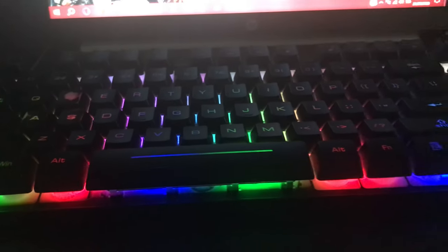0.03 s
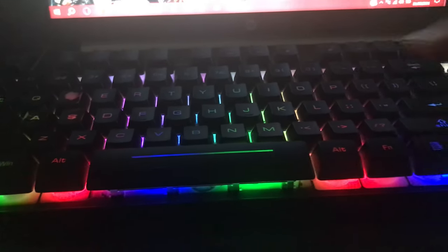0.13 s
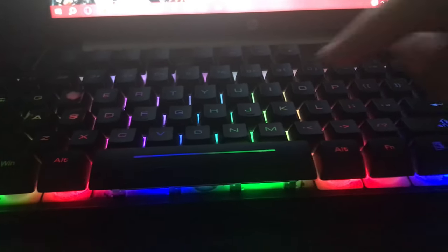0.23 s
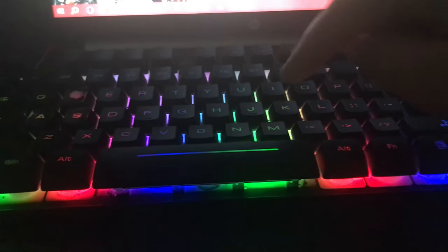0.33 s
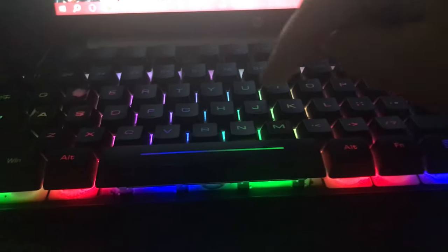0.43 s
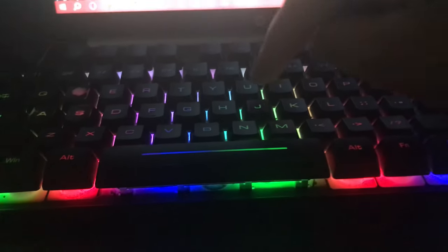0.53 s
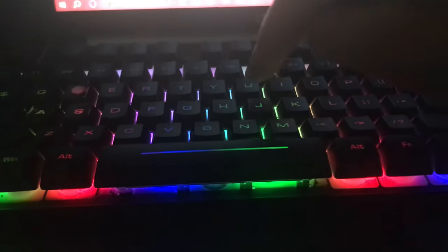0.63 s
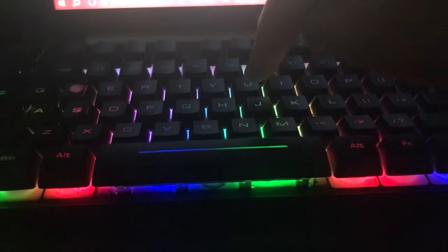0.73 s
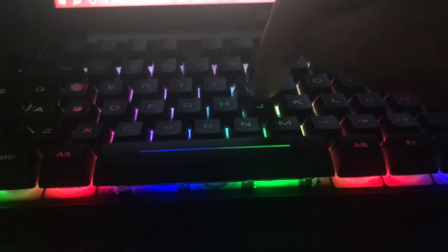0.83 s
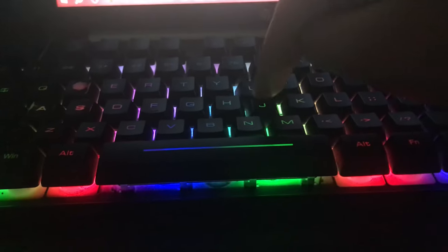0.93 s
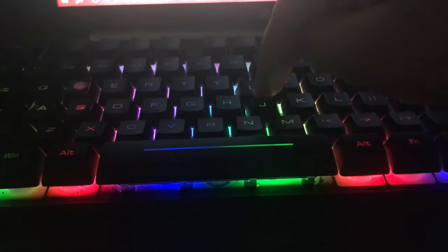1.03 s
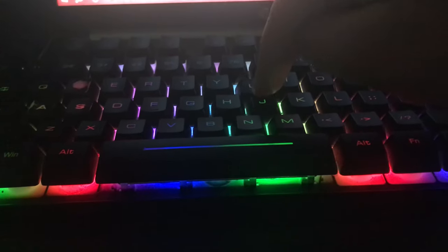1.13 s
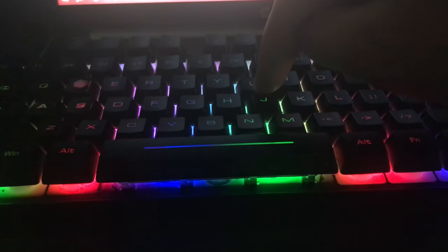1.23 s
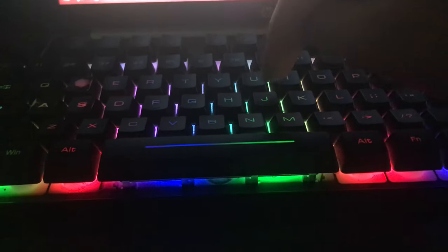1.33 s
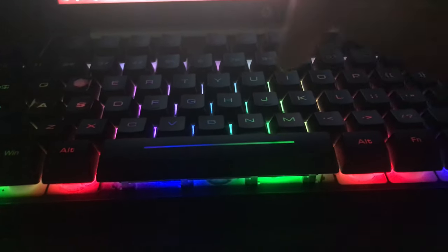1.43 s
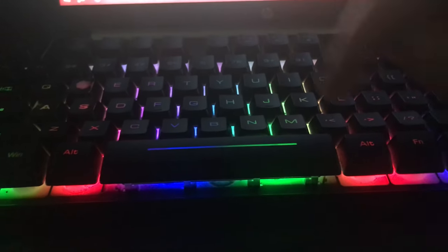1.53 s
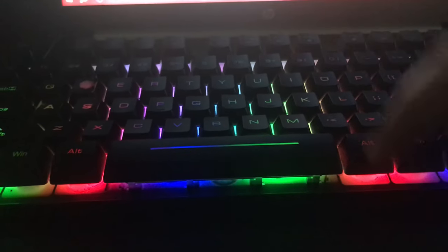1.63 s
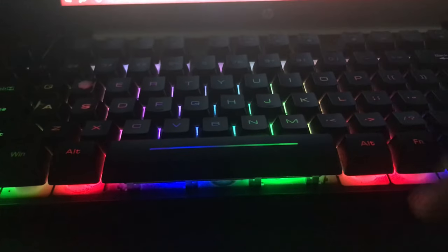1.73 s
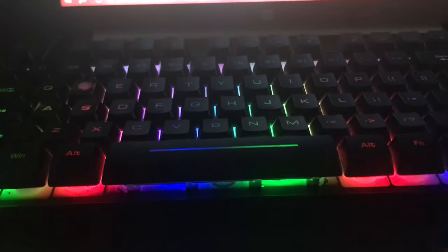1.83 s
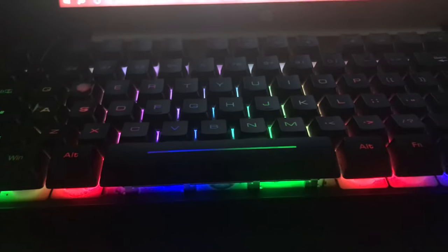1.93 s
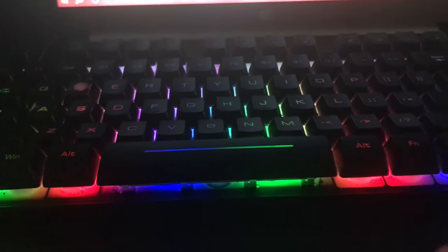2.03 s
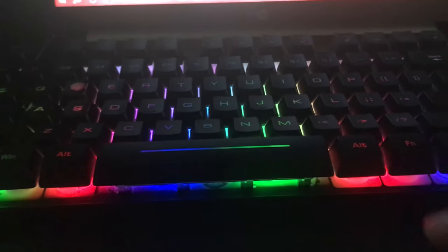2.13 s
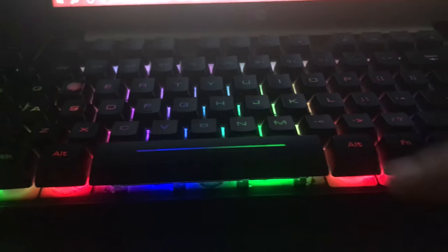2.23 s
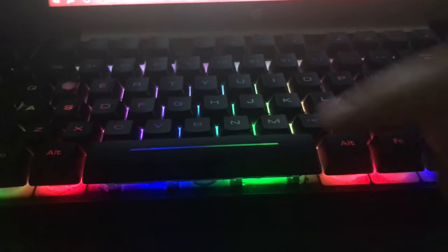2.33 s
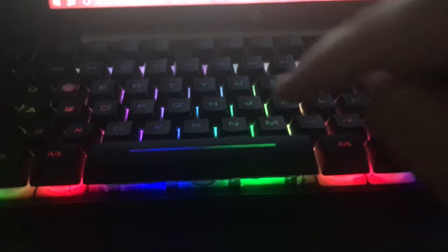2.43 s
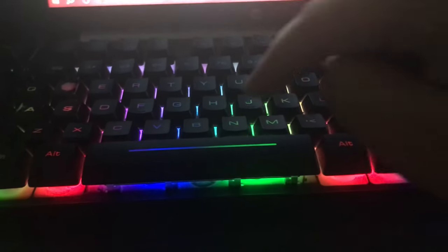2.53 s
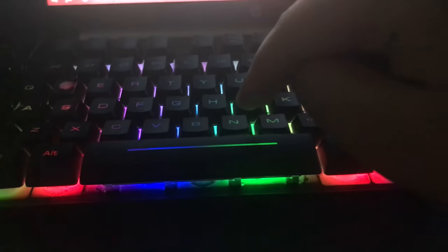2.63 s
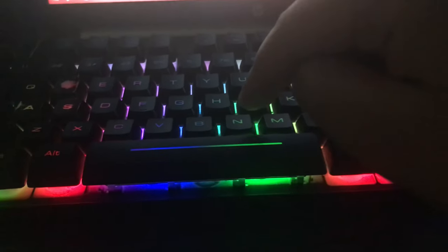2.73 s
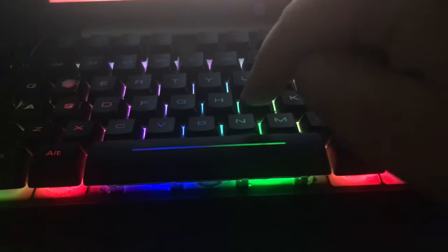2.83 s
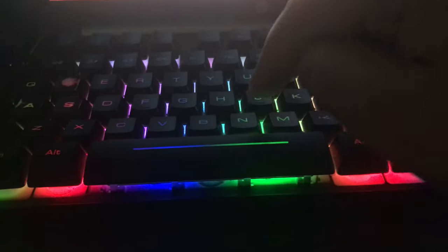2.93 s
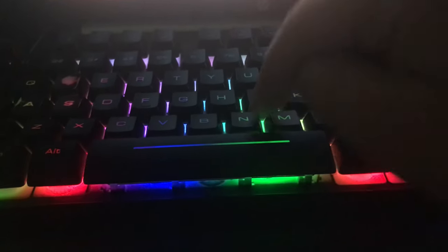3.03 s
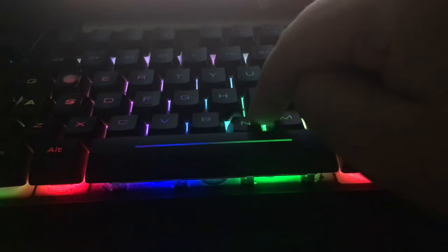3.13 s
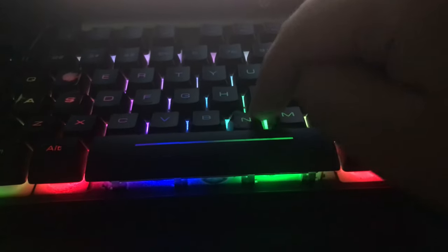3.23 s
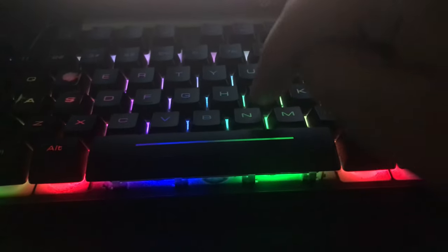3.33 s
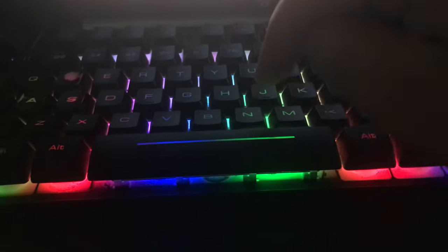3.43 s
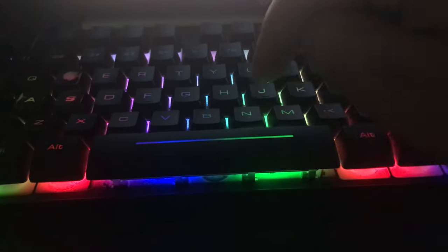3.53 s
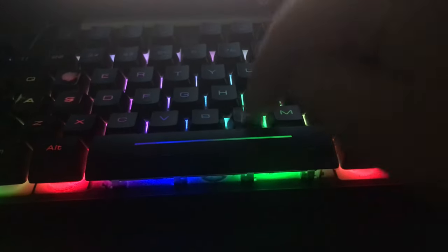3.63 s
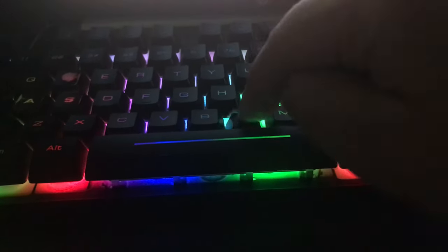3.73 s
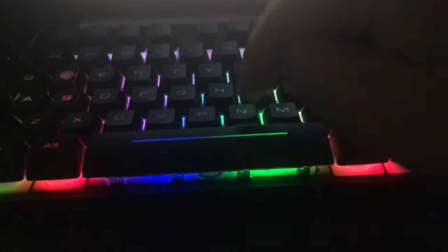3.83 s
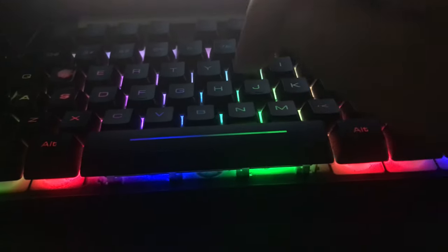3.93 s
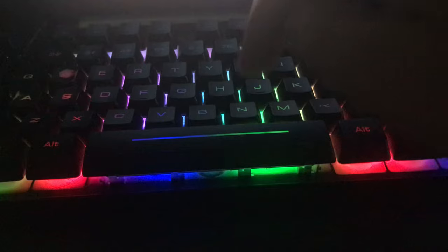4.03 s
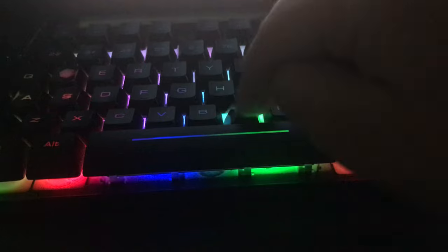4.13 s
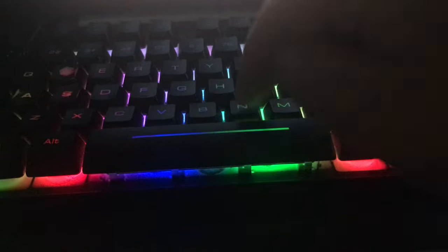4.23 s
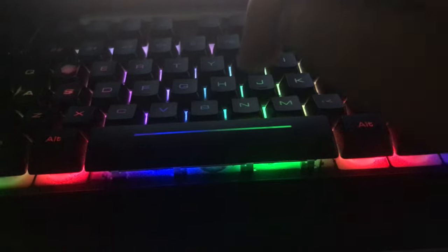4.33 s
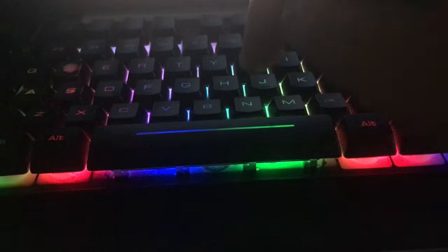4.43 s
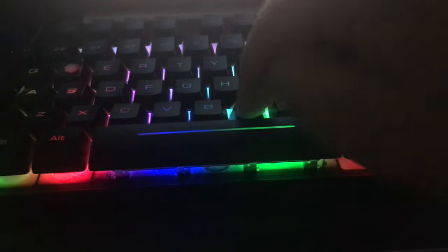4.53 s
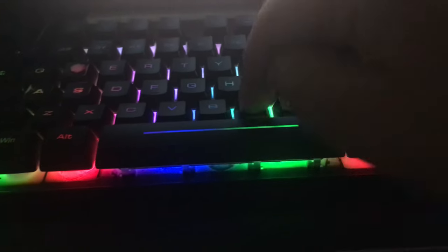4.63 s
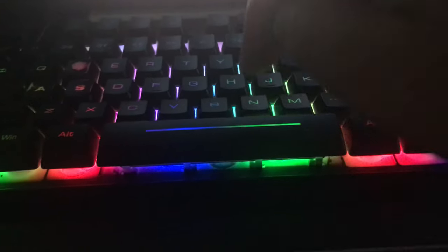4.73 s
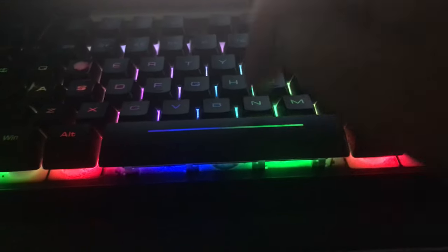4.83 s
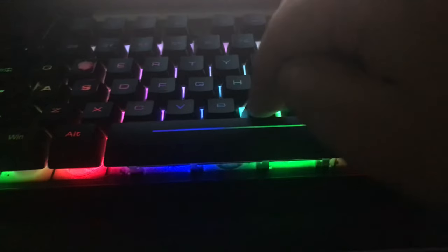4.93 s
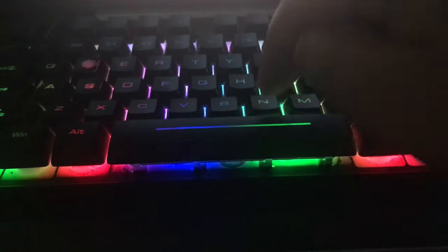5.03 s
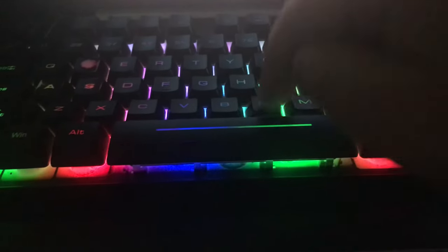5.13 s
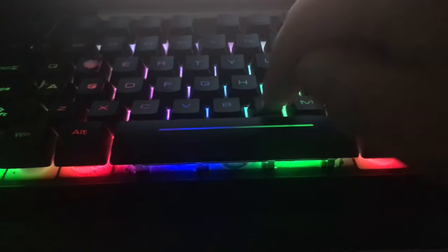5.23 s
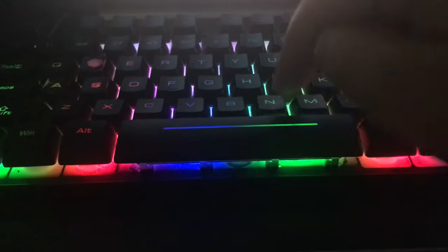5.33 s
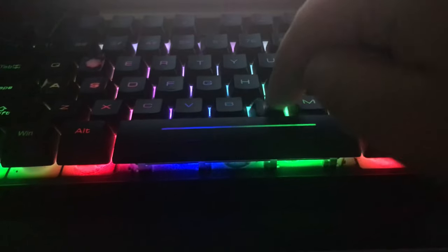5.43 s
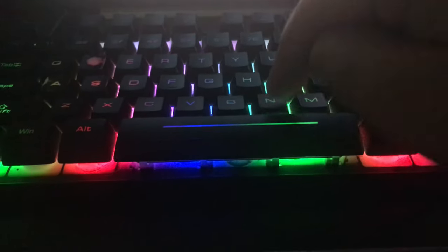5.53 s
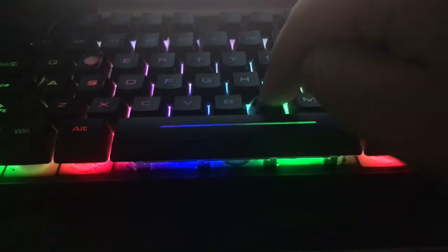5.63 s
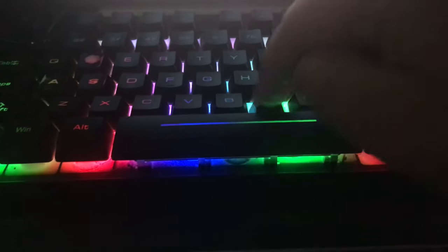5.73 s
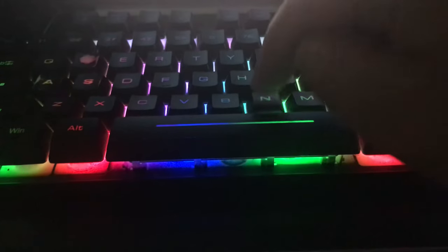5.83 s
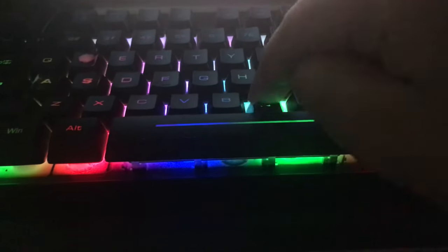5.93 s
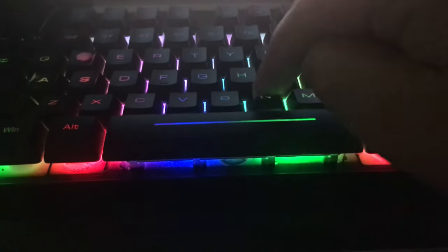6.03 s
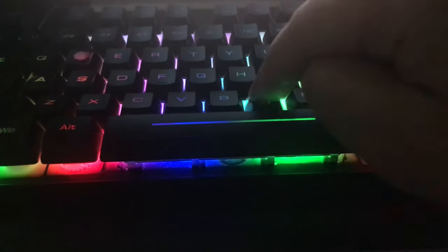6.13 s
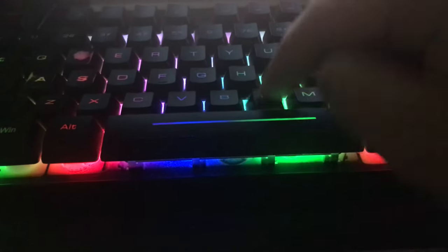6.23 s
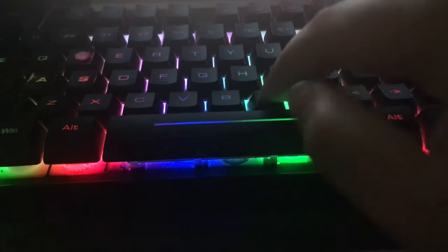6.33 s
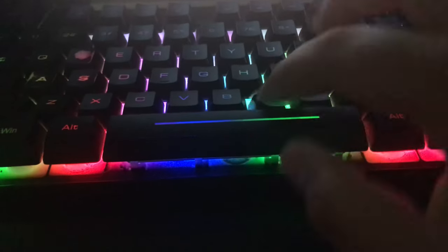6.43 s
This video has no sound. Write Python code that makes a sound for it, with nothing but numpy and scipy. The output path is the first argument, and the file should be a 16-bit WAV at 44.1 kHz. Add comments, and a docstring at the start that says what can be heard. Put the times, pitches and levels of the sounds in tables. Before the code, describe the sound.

One finger taps a plastic laptop-style keyboard in a quiet room, one lone stroke, then separate strokes quickening into frantic clattering key mashing.

```python
"""One finger pokes at a plastic backlit keyboard, close to a phone in a small quiet room with a faint hum.
A single stroke comes first; then the hand slides over the case with soft knocks and faint squeaks.
Strokes return one by one, then faster and faster: each is a tap, the key giving way, and a landing thump.
Keys clack as they spring back or are grazed; later loose neighbours chatter over a low rumble of the desk.
Each contact is a burst of tiny hits that rings the modes of the key parts, the hollow case and the desk."""
import sys
import numpy as np
from scipy import signal
from scipy.fft import rfft, irfft
from scipy.io import wavfile

SR = 44100
rng = np.random.default_rng(int(sys.argv[2]) if len(sys.argv) > 2 else 0)


def waveform_to_disk(signal):
    """Save audio, clipped to [-1, 1], as 16-bit WAV at the path in sys.argv[1]."""
    frames = np.transpose(np.atleast_2d(signal))
    scaled = np.clip(frames, -1, 1) * 32767
    samples = np.round(scaled).astype(np.int16)
    wavfile.write(sys.argv[1], SR, samples)


N = 286650  # length of the scene [samples]
CLACK_SIZE = 2600  # length of one push and of one ring [samples]


def undb(db):
    """Turn decibels into gain."""
    return 10 ** (np.asarray(db) / 20)


def unit(x):
    """Scale to an energy of one."""
    return x / np.sqrt(np.sum(x ** 2))


def lookup(hz, table):
    """Read a (frequency, value) table between its points, on a log-frequency axis."""
    f, v = np.transpose(table)
    return np.interp(np.log(np.maximum(hz, 1)), np.log(f), v)


def add(out, s, x):
    """Mix x into out at time s [s]."""
    i = max(int(s * SR), 0)
    out[i:i + len(x)] += x[:max(len(out) - i, 0)]


def band(x, lo_hz, hi_hz, order=2):
    """Keep only the sound between two frequencies."""
    edges = [lo_hz, min(hi_hz, SR / 2 - 1000)]
    return signal.sosfilt(signal.butter(order, edges, "band", fs=SR, output="sos"), x)


# What each part rings with, before small changes from clack to clack:
# (pitch [Hz], relative level [dB], time to fade by 60 dB without the finger [s])
DESK_MODES = [(89, -5, 0.15), (179, -4, 0.066), (260, 1.5, 0.13), (437, -1.5, 0.13), (575, 9, 0.071)]
CASE_MODES = [(942, -11.5, 0.11), (1036.4, 2.5, 0.06), (1101, 5, 0.033), (1170, -1, 0.05), (1484, -4, 0.12),
              (1649, -1, 0.019)]
KEYCAP_MODES = [(1920, -46, 0.044), (2187, -0.5, 0.034), (2292, 1.5, 0.037), (2565, 2.5, 0.016),
                (2646, -3.5, 0.035), (3130, -10.5, 0.011), (3074, -8, 0.098), (3870, -11, 0.016),
                (4082, -12, 0.035), (4230, -10, 0.0065), (4654, -14.5, 0.042)]
STEM_MODES = [(5600, 2.5, 0.062), (5870, -0.5, 0.061), (6800, -11, 0.013), (7126, 10.5, 0.0076),
              (7150, 3, 0.055), (7380, -2.5, 0.014), (8280, 1, 0.0089), (8650, -10, 0.023),
              (8910, -5.5, 0.015)]
EDGE_MODES = [(10000, -3, 0.0081), (12150, -19, 0.023), (12360, -4, 0.013), (14250, -11, 0.018),
              (14500, -18, 0.0089), (14750, 16, 0.006), (14300, -2, 0.017)]


def keyboard(desk_db=-18.0):
    """Stem and edge get their hits earlier in a contact, cap and case later; the case shakes the desk."""
    contact_rows = np.vstack([presses(), clacks(), chatter()])
    times, rattle_ms, case_db, cap_db, stem_db, edge_db = contact_rows.T
    landing = contacts(rattle_ms, skew=.55, scrape=0.44, lead=0.27)
    sliding = contacts(rattle_ms, skew=.85, scrape=0.67, lead=0.16)
    desk = part(DESK_MODES, times, landing, case_db + desk_db, crack=0.42, crack_lo_hz=160,
                crack_hi_hz=730, crack_t60=0.13, detune=0.012, spot_db=6.5)
    case = part(CASE_MODES, times, landing, case_db, crack=0.73, crack_lo_hz=922,
                crack_hi_hz=1876, crack_t60=0.027, detune=0.018, spot_db=3.5)
    cap = part(KEYCAP_MODES, times, landing, cap_db, crack=0.32, crack_lo_hz=1600,
               crack_hi_hz=3800, crack_t60=0.044, detune=0.011, spot_db=2.0)
    stem = part(STEM_MODES, times, sliding, stem_db, crack=0.62, crack_lo_hz=5600,
                crack_hi_hz=8930, crack_t60=0.024, detune=0.0007, spot_db=2.0)
    edge = part(EDGE_MODES, times, sliding, edge_db, crack=0.69, crack_lo_hz=9600,
                crack_hi_hz=15400, crack_t60=0.025, detune=0.013, spot_db=4)
    return desk + case + cap + stem + edge


# Full key presses: (time [s], travel time [ms], rattle of the tap [ms], tap level [dB],
# landing level [dB], extra weight on the case [dB], extra brightness [dB])
KEY_PRESSES = [(.829, 21, 3.75, -38.5, -40, -0.5, 0), (3.0697, 22, 2.6, -41, -45, -0.5, 5.5),
               (3.6566, 25.8, 3.96, -34.5, -41, 1, 3.5), (4.1242, 19.8, 2.9, -30.5, -41, -1.5, 0.5),
               (4.5452, 18.8, 5.4, -50.5, -48, 2, -1), (4.899, 15, 2.7, -37.5, -42.5, 2, 0),
               (5.166, 17.6, 3.35, -41.5, -46.5, 0, -3), (5.3827, 22.1, 4.9, -35.5, -40, 0.5, 3),
               (5.5838, 18, 3.6, -40, -49.5, 3, -1.5)]
# How tap, giving way and landing (one row each) are shared among the parts:
# (case [dB], keycap [dB], stem [dB], edge [dB])
PRESS_SHARES = [(-7.5, 0, -6.5, -10.5), (-1, -2, -9.5, -14), (-9.5, 0.5, -12.5, -19)]
# After the tap the key gives way at this share of its travel, then lands
GIVE_SHARE, GIVE_RATTLE_MS, LANDING_RATTLE_MS = .6, 2.5, 2.6


def presses():
    """A press is three contacts: tap, giving way, landing; rows of (time [s], rattle [ms], four levels [dB])."""
    rows = []
    for s, travel_ms, tap_ms, tap_db, landing_db, weight_db, bright_db in KEY_PRESSES:
        stages = [(0, tap_ms, tap_db),
                  (GIVE_SHARE, GIVE_RATTLE_MS, landing_db),
                  (1, LANDING_RATTLE_MS, landing_db)]
        for (share, rattle_ms, db), mix in zip(stages, PRESS_SHARES):
            at = s + share * travel_ms / 1000
            rows.append([at, rattle_ms, *part_levels(db, mix, weight_db, bright_db)])
    return rows


# Keys that spring back or are grazed:
# (time [s], rattle [ms], level [dB], extra weight on the case [dB], extra brightness [dB])
KEY_CLACKS = [(0.8252, 2, -56.5, 11, 12), (0.8406, 2.9, -60, -6, 14), (0.868, 0.9, -61.5, -8, 17),
              (1.0887, 0.71, -62, 7, -1), (1.2884, 5, -52.5, -4, 7.5), (1.3152, .7, -61, 4, 4),
              (1.3254, 9, -50, 5, -1), (1.344, 3, -54, 1, -3), (1.358, 2.2, -62, -5, -7),
              (3.211, 0.47, -61, 1, -10), (3.2814, 5, -60, 4, 5), (3.292, 1.46, -47.5, 0, -2),
              (3.32, 4.7, -56, 5, -2), (3.367, 3.1, -62, 5.5, -7), (3.8194, 1.45, -50, 4, 2),
              (3.845, 3.9, -44, -1, -5), (3.8493, 6, -43, 0.5, 10), (4.2281, 1.43, -51, 5.5, 0),
              (4.2426, 0.99, -47, -0.5, 7), (4.2536, 1.35, -43.5, 4.5, 4), (4.263, 0.88, -37.5, -6, 2.5),
              (4.2728, 4.6, -49, 0, 10.5), (4.2841, 4.8, -59, 7, -2), (4.5893, 2.4, -56.5, 8.5, -7),
              (4.629, 8.2, -58.5, 10, -11), (4.656, 4.1, -55, 2, 4), (4.6642, 2.07, -41, -1.5, 0),
              (4.698, 2.87, -42.5, -5.5, -0.5), (4.71, 2.8, -49, -3, 4), (4.8942, 3.1, -52.5, -13, 6),
              (4.951, 8.1, -50.5, 4.5, -12), (4.9772, 9.2, -51.5, 3, -5), (4.9989, 2.54, -40, 4, -1.5),
              (5.0402, 3.05, -54.5, -1, 11.5), (5.0487, 0.84, -46.5, -18, 1.5),
              (5.162, 2.9, -50.5, -2, 6.5), (5.215, 2.28, -47, 3, -5), (5.244, 2.04, -48, 2.5, -2),
              (5.266, 1.38, -52.5, 3, -1), (5.292, 6.9, -42.5, -0.5, 8.5), (5.4691, 6.5, -56.5, 8, 3),
              (5.4852, 2.72, -49.5, 0, 2.5), (5.5038, 3.9, -49.5, 2.5, 3.5), (5.5186, 2.7, -48, 4, -1),
              (5.5796, 2.86, -43.5, 2, 6), (5.711, 0.88, -46.5, -1, -1.5), (5.7237, 2.48, -49.5, 9, 1),
              (5.7492, 2, -36, -1.5, -1.5), (5.7863, 8.3, -51, 1, -13), (5.8138, 8.9, -52.5, 7.5, 0),
              (5.8359, 9.1, -37, -3, -3), (5.8474, 5.5, -34, 1, 5.5), (5.859, 3.8, -41, -17, 4),
              (5.865, 2.93, -37.5, -17, 2), (5.882, 2.5, -56, -9, 5), (5.917, 2.3, -42, 0, 3),
              (5.9267, 0.86, -35, 0.5, 1), (5.9486, 2.28, -38, -3.5, -3), (6.0118, 1.6, -59, 14.5, -3),
              (6.0363, 1.26, -42.5, -2, -2.5), (6.0519, 2.5, -47, -5, 1.5), (6.073, 3.8, -49.5, 6.5, 2),
              (6.0792, 5.4, -51, 9.5, 5), (6.0922, 1.03, -30, -7, 0), (6.1123, 1.97, -38.5, -2, 1.5),
              (6.172, 4.4, -63, 14, -1), (6.1867, 2.64, -42.5, 2, 4), (6.203, 1.01, -36, -4.5, 1),
              (6.2142, 1.25, -45.5, 0, 1), (6.2589, 4.4, -48, 8, 4.5), (6.2763, 0.92, -51.5, 12, 5.5),
              (6.351, 1.4, -64, 15, -3), (6.3746, 1.5, -36, -0.5, -2), (6.4017, 3.55, -43.5, 3.5, 1.5),
              (6.4252, 3.3, -48, 7, 5), (6.4377, 1.11, -31, -1.5, -2)]
# How a clack is shared among the parts: (case [dB], keycap [dB], stem [dB], edge [dB])
CLACK_SHARES = (-6, 0, -7.5, -16)


def clacks():
    """A returning or grazed key makes one contact: rows of (time [s], rattle [ms], four levels [dB])."""
    rows = []
    for s, rattle_ms, db, weight_db, bright_db in KEY_CLACKS:
        rows.append([s, rattle_ms, *part_levels(db, CLACK_SHARES, weight_db, bright_db)])
    return rows


# Spells in which loose neighbours chatter under the finger:
# (start time [s], end time [s], contacts per second [1/s], average keycap level [dB])
CHATTER_SPELLS = [(3.23, 3.291, 62, -68), (3.704, 3.814, 99, -67.5), (4.15, 4.321, 75, -65),
                  (4.57, 4.701, 116, -61), (4.922, 5.05, 96, -60), (5.179, 5.3, 112, -61.5),
                  (5.41, 5.549, 93, -59), (5.6, 5.701, 80, -62), (5.699, 6.301, 136, -60),
                  (6.299, 6.482, 105, -63)]


def chatter(scatter_db=3, case_db=-3, stem_db=-9, edge_db=-20):
    """Loose keys touch faintly at random moments: rows of (time [s], rattle [ms], four levels [dB])."""
    rows = []
    for start, end, rate, db in CHATTER_SPELLS:
        count = max(int((end - start) * rate), 1)
        u = rng.random((count, 6))
        times = start + (end - start) * u[:, 0]
        rattle_ms = 3 * u[:, 1]
        # the root of 3 makes scatter_db the standard deviation
        scatter = scatter_db * (u[:, 2:] * 2 - 1) * np.sqrt(3)
        levels = db + np.array([case_db, 0, stem_db, edge_db]) + scatter
        rows.append(np.column_stack([times, rattle_ms, levels]))
    return np.vstack(rows)


def part_levels(db, mix, weight_db, bright_db, edge_slope=0.99):
    """Weight drives the case; a hard contact drives the stem and, by edge_slope [dB per dB], the edge."""
    return db + np.array(mix) + np.array([weight_db, 0, bright_db, edge_slope * bright_db])


def contacts(rattle_ms, skew, scrape, lead, count=5):
    """A rising scuff, a first touch, more touches as the key wobbles, and scraping: one row per contact."""
    push = np.zeros((len(rattle_ms), CLACK_SIZE))
    early = SR // 1000  # the scuff lasts 1 ms
    for row, ms in zip(push, rattle_ms):
        span = int(np.clip(ms * SR / 1000, 10, CLACK_SIZE / 2))
        # a smaller skew moves the touches later
        at = (span * rng.random(count) ** skew).astype(int)
        at[0] = 0
        touches = rng.standard_normal(count) / 2 + rng.choice([-1, 1], count)
        row[early + at] = unit(touches)
        row[early:early + span] += scrape * unit(rng.standard_normal(span))
        row[:early] += lead * unit(rng.standard_normal(early) * np.arange(early) ** 2)
    return push


def part(modes, times, push, level_db, crack, crack_lo_hz, crack_hi_hz, crack_t60, detune, spot_db):
    """Each contact rings one part, with its own pitch shift, hit spot and damping by the finger."""
    hz, db, t60 = np.transpose(modes)
    t = np.arange(CLACK_SIZE) / SR
    # dense, heavily damped modes between the main ones make a dry crack
    noise = rng.standard_normal(push.shape) * undb(-60 * t / crack_t60)
    cracks = band(noise, crack_lo_hz, crack_hi_hz, order=4)
    # dividing by the root of t60 evens out the energy of short and long rings
    fades = undb(db[:, None] - 60 * t / t60[:, None]) / np.sqrt(t60[:, None])
    # a small part gives off little sound below its lowest mode; the trace of noise avoids exact zeros
    push = band(push + 1e-18 * noise, 0.89 * hz.min(), SR / 2)
    finger_damping = rng.uniform(10, 170, len(times))  # extra decay rate [1/s]
    out = np.zeros(N)
    for s, force, dry_crack, loud_db, damping in zip(times, push, cracks, level_db, finger_damping):
        spot, shift = rng.standard_normal((2, len(hz)))
        gains = undb(spot_db * spot) * rng.choice([-1, 1], len(hz))
        pitches = hz * (1 + detune * shift)
        ring = gains @ (fades * np.sin(2 * np.pi * pitches[:, None] * t))
        answer = unit(ring * np.exp(-damping * t)) + crack * unit(dry_crack)
        clack = signal.fftconvolve(force, answer)
        # the scuff comes 1 ms before the touch; the level counts all energy as if spread over 10 ms
        add(out, s - .001, unit(clack) * np.sqrt(SR / 100) * undb(loud_db))
    return out


# The nearby walls' answer: (frequency [Hz], level [dB]) and (frequency [Hz], time to fade by 60 dB [s])
ECHO_LEVELS = [(150, 8.5), (500, -7.5), (1200, -11.5), (2500, -16), (6000, -19.5), (10000, -19.5),
               (16000, -18)]
ECHO_FADES = [(150, 0.18), (1200, 0.3), (2500, 0.17), (7000, 0.21), (16000, 0.087)]


def room(x, gap_s=0.0071, build_s=0.0018):
    """Nearby walls return a short blurred tail whose level and fading time depend on pitch."""
    t = np.arange(SR // 2) / SR
    f = np.fft.rfftfreq(len(t), 1 / SR)
    rise = 1 - np.exp(-np.maximum(t - gap_s, 0) / build_s)
    response = 0
    for hz in 100 * 2 ** np.arange(0, 7.5, .5):  # half-octave bands
        inside = (f >= hz) & (f < hz * np.sqrt(2))
        noise = irfft(rfft(rng.standard_normal(len(t))) * inside, len(t))
        tail = noise * rise * undb(-60 * t / lookup(hz, ECHO_FADES))
        # each band is weighted by its width
        response = response + unit(tail) * np.sqrt(inside.mean()) * undb(lookup(hz, ECHO_LEVELS))
    return signal.fftconvolve(x, response)[:N]


def thumps(delay_s=.016, below_landing_db=-13, hz=71.5, t60_s=0.22):
    """The desk gives a little after each landing: rows of (time [s], level [dB], pitch [Hz], fade [s])."""
    return [(s + travel_ms / 1000 + delay_s, landing_db + below_landing_db, hz, t60_s)
            for s, travel_ms, _, _, landing_db, _, _ in KEY_PRESSES]


# Soft knocks of the hand on case and desk:
# (time [s], level of the tone's peak before the soft start [dB], pitch [Hz], time to fade by 60 dB [s])
HAND_KNOCKS = [(1.704, -49.5, 260, 0.04), (2.232, -52.5, 275, 0.031), (2.311, -48.5, 76.6, 0.075),
               (2.435, -43.5, 96.5, 0.041), (4.435, -54, 64.8, 0.33), (5.758, -48.5, 93, 0.19),
               (5.799, -50, 63.3, 0.18), (5.93, -53.5, 97.5, 0.16), (6.291, -49.5, 73.1, 0.42)]


def knocks(rustle=1.86, softness=0.02):
    """A soft, slow push sets the desk or the case swinging, with a low rustle that fades along."""
    out = np.zeros(N)
    t = np.arange(SR // 2) / SR
    for s, db, hz, t60 in HAND_KNOCKS + thumps():
        swing = np.sin(2 * np.pi * hz * t) + rustle * band(rng.standard_normal(len(t)), 81, 650)
        soft_start = 1 - np.exp(-t / (softness * t60))
        add(out, s, swing * undb(db - 60 * t / t60) * soft_start)
    return out


def rumble(above_chatter_db=10.5, lo_hz=60, hi_hz=290):
    """The hand's weight makes the desk shudder low and unevenly under each spell of chatter."""
    out = np.zeros(N)
    for start, end, _, db in CHATTER_SPELLS:
        swell = np.sqrt(abs(np.sin(np.linspace(0, np.pi, int((end - start) * SR)))))
        shudder = band(rng.standard_normal(len(swell)), lo_hz, hi_hz)
        # the level is that of the noise before the band filter
        add(out, start, undb(db + above_chatter_db) * swell * shudder)
    return out


# The hand slides over the case on its way to the keys:
# (time [s], length [s], noise level before the band filter [dB])
HAND_SLIDES = [(1.682, .06, -73), (2.248, 0.26, -73.5)]


def slides(lo_hz=4000, hi_hz=14000):
    """Skin rubs on plastic: a faint hiss that swells and fades."""
    out = np.zeros(N)
    for s, length, db in HAND_SLIDES:
        swell = np.sin(np.linspace(0, np.pi, int(length * SR)))
        hiss = band(rng.standard_normal(len(swell)), lo_hz, hi_hz)
        add(out, s, undb(db) * swell * hiss)
    return out


# Faint short squeaks: (time [s], length [s], pitch [Hz], rms level at the height of the swell [dB])
FAINT_SQUEAKS = [(1.696, 0.023, 867, -66), (1.745, 0.042, 878, -70.5), (2.227, 0.058, 875, -74.5)]


def squeaks():
    """Short thin pure tones swell and fade."""
    out = np.zeros(N)
    for s, length, hz, db in FAINT_SQUEAKS:
        t = np.arange(int(length * SR)) / SR
        swell = np.sqrt(2 * np.sin(np.pi * t / length))
        add(out, s, undb(db) * swell * np.sin(2 * np.pi * hz * t))
    return out


# Colour of the room noise: (frequency [Hz], relative level per hertz [dB])
AIR_COLOUR = [(15, -77), (25, -54), (41, -6.5), (64, 2.5), (87, -6.5), (120, -9), (212, -11.5),
              (301, -11.5), (427, -17.5), (476, -16), (516, -19), (1370, -21.5), (5140, -30), (8830, -31.5),
              (16000, -36.5)]
# Mains hum: (pitch [Hz], rms level [dB])
HUM_TONES = [(59.2, -77.5), (114, -73.5)]


def background(air_db=-65, wander_step=0.01405):
    """Smooth room noise of rms air_db, and a low hum whose phase drifts by random steps [rad]."""
    colour = undb(lookup(np.fft.rfftfreq(N, 1 / SR), AIR_COLOUR))
    air = irfft(rfft(rng.standard_normal(N)) * colour, N)
    out = unit(air) * np.sqrt(N) * undb(air_db)
    for hz, db in HUM_TONES:
        wander = wander_step * np.cumsum(rng.standard_normal(N))
        out += np.sqrt(2) * undb(db) * np.sin(2 * np.pi * hz * np.arange(N) / SR + wander)
    return out


def scene():
    """Keys and their echo sound over the small noises of the hand, the desk and the room."""
    keys = keyboard()
    hand_and_desk = knocks() + rumble() + slides() + squeaks()
    return (keys + room(keys) + hand_and_desk + background())[None]


# Peaks and dips of the microphone port: (frequency [Hz], width [Hz], level [dB])
PORT_PEAKS = [(4740, 170, -2), (7770, 1190, -4.5), (8980, 260, 5), (10430, 350, -10)]


def record(dry, top_hz=16100):
    """The microphone port colours the treble and the phone cuts what lies above top_hz."""
    for hz, width_hz, db in PORT_PEAKS:
        b, a = signal.iirpeak(hz, hz / width_hz, fs=SR)
        dry = dry + (undb(db) - 1) * signal.lfilter(b, a, dry)
    return signal.sosfilt(signal.ellip(8, .2, 70, top_hz, fs=SR, output="sos"), dry)


dry = scene()
out = record(dry)
waveform_to_disk(out)
```